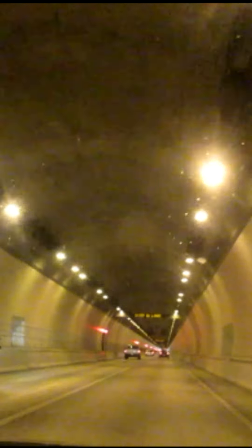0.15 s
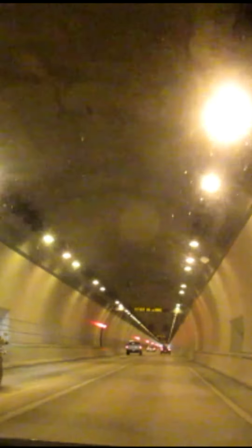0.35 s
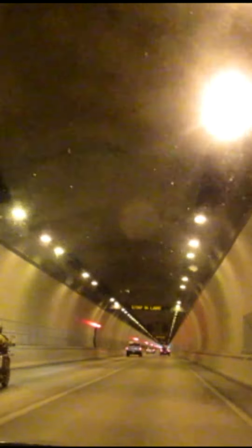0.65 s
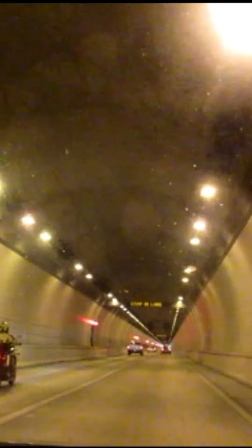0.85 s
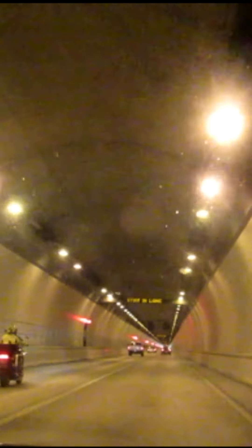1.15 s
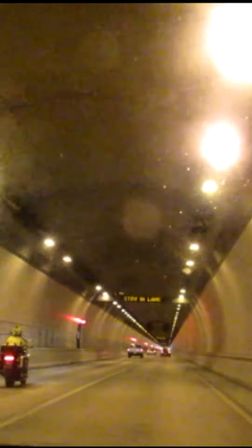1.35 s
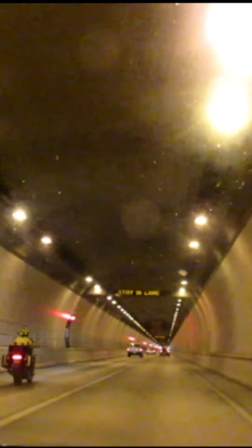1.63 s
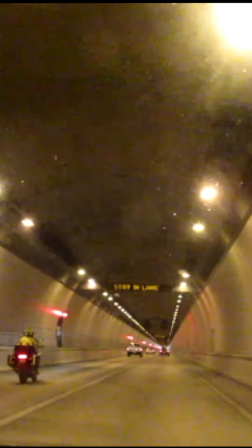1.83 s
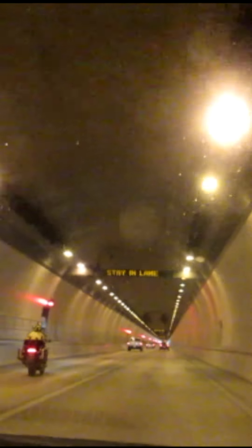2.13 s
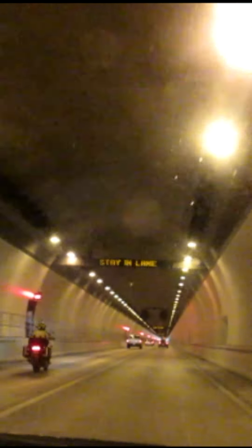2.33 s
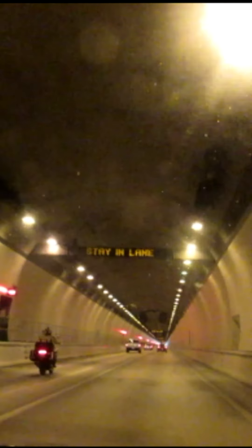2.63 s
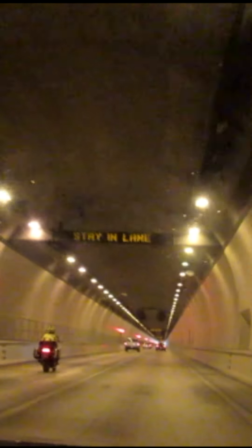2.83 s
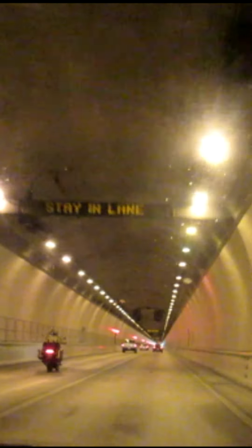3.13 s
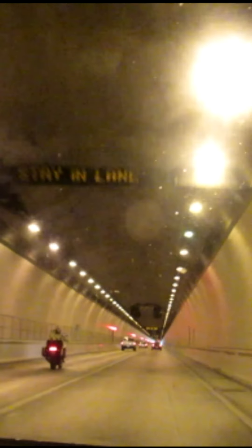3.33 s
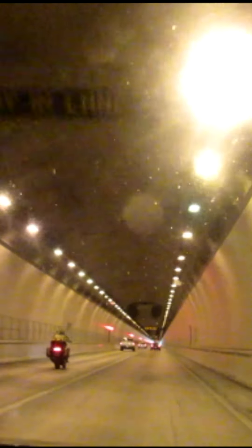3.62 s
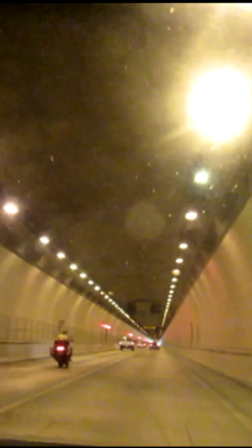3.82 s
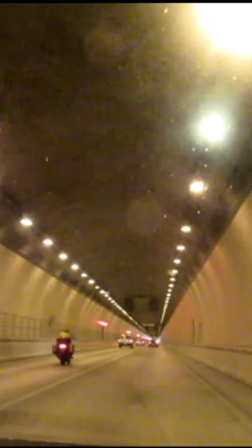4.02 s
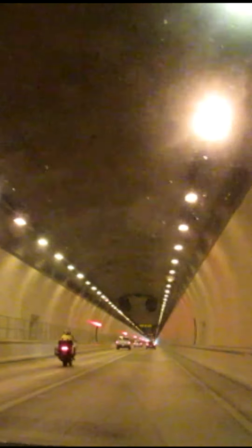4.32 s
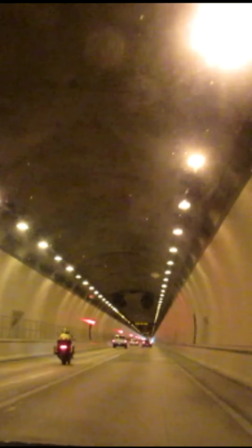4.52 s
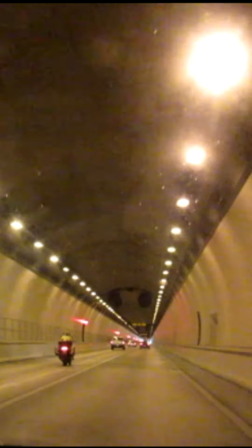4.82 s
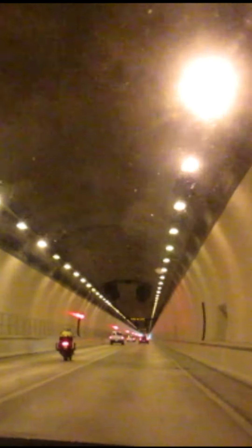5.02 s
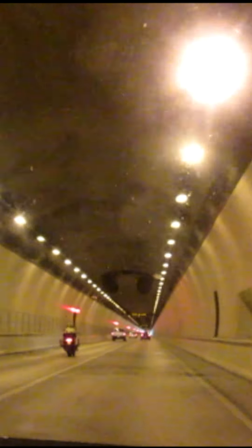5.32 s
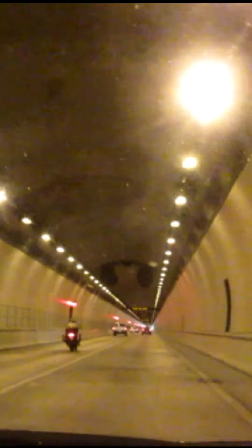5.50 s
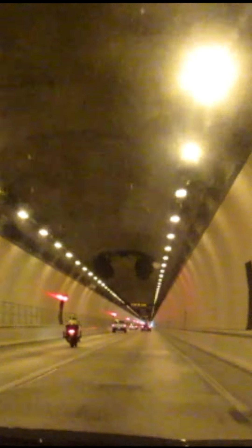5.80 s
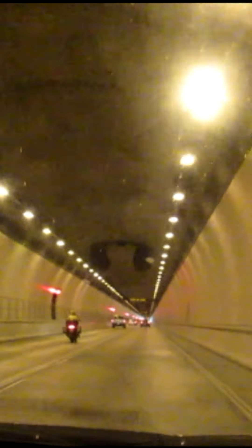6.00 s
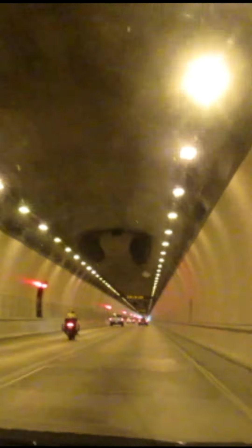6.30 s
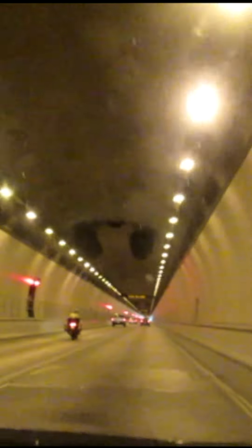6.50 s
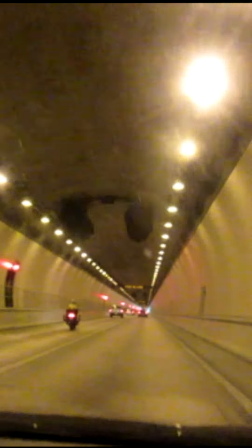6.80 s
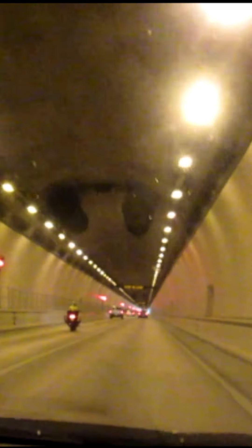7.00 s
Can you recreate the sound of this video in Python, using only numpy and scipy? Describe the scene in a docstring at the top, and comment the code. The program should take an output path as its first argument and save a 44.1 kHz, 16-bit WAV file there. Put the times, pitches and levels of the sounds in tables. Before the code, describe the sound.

From 0 to about 7 seconds, an unbroken wash of road noise fills a car cabin moving at steady speed through a concrete tunnel. Deep heave and rumble lie below a coarse midrange tyre roar, with a thin, slowly weakening wind hiss. A strong low hum wavers in pitch and swells in irregular short booms several times a second, cut by tiny dropouts; an especially strong boom comes near 5.6. Faint engine drone stays buried, slightly stronger around 2.6. A motorbike's low exhaust tone is faintly present at first, strongest near 1.8, and gone by 4. The roar dips slightly and recovers at about 1.2, 2.1, 3.3, 4.5, 5.9 and 6.5. A dull joint knock lands at 4.7, then a cluster at 6.4, one at 6.7 and one at 7.0. Loose lining rattles from 6.3 onward, with tiny bright ticks at 6.7 and 7.0. The sound stops while still driving.

```python
"""Road noise inside a car at steady speed in a concrete tunnel: coloured noise for heave, rumble, roar and hiss.
A wavering tone with a noisy skirt is the booming cabin hum; a narrow antiphase noise band is the tyre ring.
Faint engine and motorbike sine tones stand in the rumble; the bike draws ahead in the next lane and fades.
Joints knock as short damped modes, loose lining rattles as lumpy noise, the trim ticks as noise bursts."""
import sys
import numpy as np
from scipy import signal
from scipy.fft import rfft, irfft
from scipy.io import wavfile

SR = 44100
rng = np.random.default_rng(int(sys.argv[2]) if len(sys.argv) > 2 else 0)


def to_wav(sig):
    """Store sig (one row per channel, or 1-D mono) as 16-bit WAV at the path in sys.argv[1].

    Samples outside -1..1 are clipped; the rate is SR.
    """
    pcm = np.clip(np.atleast_2d(sig), -1, 1) * 32767
    pcm = np.round(pcm).astype(np.int16)
    wavfile.write(sys.argv[1], SR, pcm.T)  # frames by channels


N = 315315

# road roughness: time_s, roughness_db
ROUGHNESS = [(0, -3), (.25, -1), (.75, -0.5), (1.05, 0), (1.8, 0.5), (2.5, 0.), (3.0, 0.), (3.8, -0.5),
             (4.35, 1), (4.75, 0.5), (5.2, 1.16), (5.8, -1), (6.15, -0.5), (6.4, 1), (6.65, 0), (7.0, 1),
             (7.15, 0)]
# slow body heave: time_s, level_db
HEAVE = [(0, -27), (.55, -21), (.82, -26), (1.1, -18.5), (1.38, -26.5), (1.7, -21), (2.2, -27),
         (3.2, -25.5), (3.6, -23.5), (4.1, -23), (4.65, -22), (4.95, -24), (5.35, -18), (5.8, -23),
         (6.05, -28.5), (6.32, -18), (6.6, -22), (7.15, -16.5)]
# noise spectra, scaled later to unit rms: freq_hz, relative_density_db
HEAVE_COLOUR = [(7.1, -49), (12, -13), (70, -12), (97, -8), (110, -3.5), (140, -32), (240, -120)]
RUMBLE_COLOUR = [(62, -35), (105, -11), (130, -0.5), (155, -6.5), (227, -12), (260, -17.5), (311, -12),
                 (420, -19), (500, -20.5), (580, -25), (660, -27.5), (690, -39), (900, -80)]
ROAR_COLOUR = [(600, -43.5), (690, -16), (725, -10), (770, -5), (880, -2), (940, -1), (1010, 0.5),
               (1090, -2), (1140, -3), (1210, -7), (1320, -3.5), (1400, -5.5), (1490, -5), (1620, -9),
               (1720, -7), (1790, -10.5), (1870, -7), (2050, -10.5), (2160, -13.5), (2280, -12.5),
               (2600, -17), (3000, -21), (3210, -25), (3350, -24), (4170, -34), (7060, -120)]  # includes the cabin's ripples
HISS_COLOUR = [(2200, -25), (3200, -4.5), (4300, -1), (5000, -2), (6500, -4.5), (8000, -6), (10000, -9),
               (12500, -17), (13000, -21.5), (15000, -30)]
# heave and rumble thin around the cabin mode: center_hz, width_hz, share_removed
HUM_CLEARING = (131, 30, .6)
# edges of the roar bands that surge separately: edge_hz
ROAR_SPLITS_HZ = [850, 1200, 1650, 2150, 2800]
# gusts in the wind hiss: center_s, half_length_s, lift_db
GUSTS = [(1.12, .08, 0.5), (2.055, .082, 3), (3.219, .06, 0), (4.41, 0.062, 0.5)]
# drops of rumble, roar and hiss, each with a slow recovery: start_s, drop_db
STEPS = [(1.18, 1.5), (2.115, 2.5), (3.275, 1.5), (4.469, 2.5), (5.9, 1.5), (6.45, 2.5)]
RUMBLE_DB, ROAR_DB, HISS_DB = -20, -23.5, -45.5  # at zero roughness; hiss at time 0
RUMBLE_DB_PER_ROUGHNESS_DB, HISS_DB_PER_ROUGHNESS_DB = 1.4, 0.73
HISS_FADE_DB_PER_S = 0.26
FALL_S, RECOVERY_S = 0.017, 0.75  # linear fall; recovery to 1/e
SURGE_DB, SURGE_RATE_HZ = 0.6, 12

# hum between booms; pitch holds through booms too: time_s, pitch_hz, level_db (rms)
HUM_BED = [(0.0, 130.7, -24.5), (0.08, 125, -23), (0.38, 126.9, -20.5), (0.74, 125.1, -25),
           (1.19, 128.2, -25), (1.51, 127.8, -24), (1.65, 119, -22), (1.81, 120, -18.5), (1.91, 130, -26.5),
           (2.11, 133.1, -16), (2.35, 132.3, -21.5), (2.55, 139.3, -20), (2.73, 133.2, -23),
           (3.17, 136.5, -15.5), (3.44, 135.0, -17.5), (3.94, 135.3, -20.5), (4.04, 131.9, -23),
           (4.26, 135.8, -20.5), (4.38, 128.3, -24.5), (4.88, 135.8, -23.5), (4.96, 128.5, -29.5),
           (5.16, 127.2, -26), (5.26, 118.9, -28.5), (5.34, 127.2, -29), (5.63, 127.4, -23.5),
           (5.71, 133.5, -22), (5.83, 134.5, -15), (5.97, 126.6, -19), (7.09, 131.4, -20.5),
           (7.15, 130, -18)]
# hum swells added to the bed: center_s, peak_rms_db, length_s (at half height)
HUM_BOOMS = [(.091, -16.5, 0.03), (.267, -16, 0.032), (.34, -18, 0.056), (0.448, -15, .055),
             (0.551, -20, 0.097), (0.701, -13, 0.019), (.869, -13, 0.027), (1.04, -16.5, .06),
             (1.14, -14.5, 0.078), (1.275, -14, 0.032), (1.43, -28, 0.03), (1.73, -20, 0.023),
             (1.949, -19, 0.052), (2.111, -13, 0.037), (2.279, -15.5, 0.12), (2.514, -12.5, 0.017),
             (2.65, -25, 0.034), (2.916, -14, 0.026), (3.275, -17, 0.045), (3.4, -32, 0.14),
             (3.52, -20.5, 0.1), (3.764, -16, 0.05), (4.038, -23, 0.09), (4.281, -18.5, 0.082),
             (4.451, -13.5, 0.074), (4.6, -19.5, .05), (4.88, -20, 0.057), (5.03, -16, 0.026),
             (5.1, -22, 0.024), (5.176, -12.5, 0.042), (5.406, -17.5, 0.1), (5.53, -15, 0.034),
             (5.631, -10, 0.028), (5.741, -18, 0.078), (5.888, -15.5, 0.04), (6.1, -23, 0.033),
             (6.183, -14, 0.016), (6.279, -21, 0.067), (6.44, -19, 0.06), (6.544, -16.5, 0.043),
             (6.65, -26, 0.054), (6.83, -23, 0.08), (6.99, -22.5, 0.13), (7.122, -13.5, 0.025)]
# brief hum dropouts: center_s, depth_db
HUM_GAPS = [(.135, 10), (.62, 9), (1.62, 10), (2.41, 8), (2.55, 3), (2.68, 7), (3.08, 5.5), (4.35, 12),
            (4.7, 8), (5.27, 12), (5.57, 18), (5.66, 10), (5.84, 14), (5.97, 9), (6.14, 12), (6.23, 14),
            (6.39, 1), (7.07, 13)]
# noisy skirt of the cabin mode: center_hz, width_hz, level_db
HUM_SKIRT = (129, 14, -33)
HUM_WAVER_DB, HUM_WOBBLE_HZ = 0.7, 2.5  # spreads of bed level and pitch
HUM_GAP_HALF_S = 0.012

# air ring inside the tyres: center_hz, width_hz, level_db
TYRE_CAVITY = (241, 8, -41)

# engine, before TONE_TRIM_DB: time_s, firing_hz, level_db
ENGINE = [(0, 75.3, -33.5), (1.5, 76, -37.5), (2.3, 77.5, -33), (2.6, 77.54, -24), (3.4, 77.4, -29.5),
          (3.8, 77.94, -30), (4.4, 78.52, -33.5), (4.7, 78.8, -40), (5.5, 78.87, -33.5), (7.15, 77.6, -32)]
# engine orders: firing_multiple, relative_db
ENGINE_ORDERS = [(1, -9), (3, 0), (4, -7.5)]
# steady-pitch drone, before TONE_TRIM_DB: pitch_hz, level_db
DRONE = [(100, -40.5), (200, -34)]
# rough noise near the sixth order: center_hz, width_hz
GROAN_BAND = (462, 30)
# groan: time_s, level_db
GROAN_LEVEL = [(0, -37), (1, -39), (2, -46.5), (2.7, -38), (3.1, -33), (3.5, -41), (4.3, -36.5),
               (4.8, -38.5), (5.2, -30), (5.7, -34), (6.1, -35), (7.15, -37.5)]
# motorbike exhaust, before TONE_TRIM_DB: time_s, pitch_hz, level_db
BIKE = [(0, 157.3, -31), (1, 160.8, -27.5), (1.8, 164.5, -25), (2.5, 170.8, -36), (3.2, 170.1, -39),
        (4, 165.8, -57)]
TONE_TRIM_DB = 1

# road joints: start_s, peak_db
KNOCKS = [(4.666, -17), (6.364, -15), (6.372, -12), (6.426, -16), (6.743, -11.5), (7.036, -17)]
# body panel modes: freq_hz, relative_db
KNOCK_MODES = [(720, -6), (880, 0), (1040, -4), (1400, -12)]
KNOCK_SWELL_S = 0.0035  # time to envelope peak
# loose lining: time_s, level_db
RATTLE = [(0, -71.5), (6.25, -45.5), (6.34, -32), (6.4, -33), (6.46, -32), (6.8, -33), (7.15, -33.5)]
# rattle noise band: center_hz, width_hz
RATTLE_BAND = (860, 450)
# trim ticks: start_s, initial_rms_db
TICKS = [(6.738, -36), (7.038, -39)]
# tick spectrum, scaled later to unit rms: freq_hz, relative_density_db
TICK_COLOUR = [(1500, -10), (3500, -5), (4600, 4), (5800, -10), (7500, -12), (9000, -7), (11000, -12),
               (15000, -30)]
TICK_DECAY_S = 0.004  # to 1/e

# likeness of the two microphone ports: freq_hz, coherence
LIKENESS = [(20, .98), (70, .94), (130, .99), (350, .95), (550, .87), (750, .95), (950, .8), (2200, .94),
            (4000, .8), (6000, .58), (9000, .25), (15000, .15)]
# port level balance: freq_hz, left_minus_right_db
BALANCE_DB = [(16, -2), (40, 1), (130, 2.5), (330, 2), (500, 0), (1200, -1.5), (3000, -1), (8000, .6)]
# port phase: freq_hz, left_lead_rad
LEAD_RAD = [(16, 1.85), (30, 1.35), (60, .85), (130, .35), (230, .1), (500, -.4), (2000, -.12), (6000, -.4),
            (10000, -2)]
CUTOFF_HZ = 15050


def from_db(db):
    """Decibels to gain."""
    return 10 ** (np.asarray(db) / 20)


def rms_one(x):
    """Scale to unit rms."""
    return x / np.sqrt(np.mean(x ** 2) + 1e-20)


def in_time(rows):
    """Interpolate the columns of a time table to one value a sample."""
    time_s, *columns = np.transpose(rows)
    return [np.interp(np.arange(N) / SR, time_s, c) for c in columns]


def at_hz(points, size=N):
    """Interpolate a frequency table over log frequency onto the FFT grid."""
    hz, value = np.transpose(points)
    grid_hz = np.maximum(np.fft.rfftfreq(size, 1 / SR), 1)
    return np.interp(np.log(grid_hz), np.log(hz), value)


def drift(rate_hz):
    """Slow random wander of unit rms: two-pole low-passed noise made at SR / 40."""
    r = np.exp(-80 * np.pi * rate_hz / SR)
    white = rng.standard_normal(N // 40 + 2002)
    slow = signal.lfilter([1], [1, -2 * r, r * r], white)[2000:]  # skip the settling
    return np.interp(np.arange(N) / 40, np.arange(len(slow)), rms_one(slow))


def noise(gain, flicker_db=0., flicker_rate_hz=8.):
    """Coloured noise partly shared by the ports; shared part at unit rms before level flicker."""
    alike = np.clip(at_hz(LIKENESS), 0, 1)
    mid, side = rfft(rng.standard_normal((2, N))) * gain
    mid *= np.sqrt(1 + alike)
    side *= np.sqrt(1 - alike)
    pair = irfft(np.array([mid + side, mid - side]), N)
    return pair / pair.mean(axis=0).std() * from_db(flicker_db * drift(flicker_rate_hz))


def narrow(center_hz, width_hz):
    """Gain of a resonance passed twice; width at half gain."""
    offset_hz = np.fft.rfftfreq(N, 1 / SR) - center_hz
    return 1 / (1 + (2 * offset_hz / width_hz) ** 2)


def wavering(pitch_hz, level_db, waver_db):
    """A sine whose level and phase wander as the tunnel's echoes shift."""
    gain = from_db(level_db + TONE_TRIM_DB + waver_db * drift(0.98))
    phase_rad = 2 * np.pi * np.cumsum(pitch_hz) / SR + 0.52 * drift(2.8)
    return gain * np.sin(phase_rad)


def road():
    """The road shakes the body into heave and rumble; tyre roar and wind hiss come through the glass."""
    t = np.arange(N) / SR
    rough_db, = in_time(ROUGHNESS)
    center_hz, width_hz, share = HUM_CLEARING
    clearing = 1 - share * narrow(center_hz, width_hz)

    heave = from_db(in_time(HEAVE)[0]) * noise(from_db(at_hz(HEAVE_COLOUR)) * clearing)

    rumble_gain = from_db(RUMBLE_DB + RUMBLE_DB_PER_ROUGHNESS_DB * rough_db)
    rumble_colour = from_db(at_hz(RUMBLE_COLOUR)) * clearing
    rumble = rumble_gain * noise(rumble_colour, flicker_db=0.5, flicker_rate_hz=21.0)

    roar = from_db(ROAR_DB + rough_db) * surging_roar()

    gust_db = sum(db * np.exp(-.5 * ((t - s) / half_s) ** 2) for s, half_s, db in GUSTS)
    hiss_db = HISS_DB + HISS_DB_PER_ROUGHNESS_DB * rough_db - HISS_FADE_DB_PER_S * t + gust_db
    hiss = from_db(hiss_db) * noise(from_db(at_hz(HISS_COLOUR)), flicker_db=0.5, flicker_rate_hz=17.0)
    return heave + from_db(steps_db()) * (rumble + roar + hiss)


def surging_roar():
    """Tyre roar in neighbouring bands, each swelling and sinking by itself."""
    whole = rfft(noise(from_db(at_hz(ROAR_COLOUR)), flicker_db=0.09, flicker_rate_hz=22.0))
    band = np.searchsorted(ROAR_SPLITS_HZ, np.fft.rfftfreq(N, 1 / SR))
    return sum(from_db(SURGE_DB * drift(SURGE_RATE_HZ)) * irfft(whole * (band == k), N)
               for k in range(band.max() + 1))


def steps_db():
    """Level drops that fall quickly and recover exponentially."""
    t = np.arange(N) / SR
    total_db = np.zeros(N)
    for start_s, drop_db in STEPS:
        fall = np.clip((t - start_s) / FALL_S, 0, 1)
        total_db -= drop_db * fall * np.exp(-np.maximum(t - start_s, 0) / RECOVERY_S)
    return total_db


def hum():
    """The cabin mode: one wavering tone swelled by booms and cut by gaps, plus a noisy skirt."""
    t = np.arange(N) / SR
    pitch_hz, bed_db = in_time(HUM_BED)
    level = from_db(bed_db + HUM_WAVER_DB * drift(4.7))
    for center_s, peak_db, length_s in HUM_BOOMS:
        level += from_db(peak_db) * np.cos(np.pi / 2 * np.clip((t - center_s) / length_s, -1, 1)) ** 2
    gap_db = sum(db * np.exp(-.5 * ((t - s) / HUM_GAP_HALF_S) ** 2) for s, db in HUM_GAPS)
    level *= from_db(-gap_db)
    pitch_hz = pitch_hz + HUM_WOBBLE_HZ * drift(6)
    tone = np.sqrt(2) * level * np.sin(2 * np.pi * np.cumsum(pitch_hz) / SR)  # level is rms
    center_hz, width_hz, skirt_db = HUM_SKIRT
    return tone + from_db(skirt_db) * noise(narrow(center_hz, width_hz))


def tyre_ring():
    """Tyre air resonance: narrow noise in opposite phase left and right."""
    center_hz, width_hz, level_db = TYRE_CAVITY
    ring = irfft(rfft(rng.standard_normal(N)) * narrow(center_hz, width_hz), N)
    return from_db(level_db) * rms_one(ring) * [[1], [-1]]


def engine():
    """Orders of the firing rate, a steady-pitch drone and a rough noise band (groan)."""
    firing_hz, level_db = in_time(ENGINE)
    orders = sum(wavering(k * firing_hz, level_db + db, waver_db=0.5) for k, db in ENGINE_ORDERS)
    drone = sum(wavering(np.full(N, hz), db, waver_db=1.0) for hz, db in DRONE)
    groan = from_db(in_time(GROAN_LEVEL)[0]) * noise(narrow(*GROAN_BAND))
    return orders + drone + groan


def motorbike():
    """One exhaust tone, gliding in pitch and fading."""
    pitch_hz, level_db = in_time(BIKE)
    return wavering(pitch_hz, level_db, waver_db=2.5)


def knocks():
    """Tyres hit joints: panel modes swell and die, each with random strength and phase."""
    t = np.arange(SR // 20) / SR
    out = np.zeros(N + SR)
    swell = t / KNOCK_SWELL_S * np.exp(1 - t / KNOCK_SWELL_S)
    for start_s, peak_db in KNOCKS:
        ring = np.zeros(len(t))
        for hz, mode_db in KNOCK_MODES:
            strength, phase = rng.standard_normal(2)
            ring += from_db(mode_db + 1.5 * strength) * np.sin(2 * np.pi * hz * t + .6 * phase)
        knock = swell * ring
        out[round(start_s * SR):][:len(t)] += from_db(peak_db) * knock / np.abs(knock).max()
    return out[:N]


def rattle():
    """Loose cabin lining on rougher road: lumpy mid-band noise."""
    lumpy = noise(narrow(*RATTLE_BAND), flicker_db=3.0, flicker_rate_hz=25.0)
    return from_db(in_time(RATTLE)[0]) * lumpy


def ticks():
    """Trim ticks: bright noise bursts with exponential decay."""
    t = np.arange(N) / SR
    shape = np.zeros(N)
    for start_s, level_db in TICKS:
        decay = np.exp(-np.maximum(t - start_s, 0) / TICK_DECAY_S)
        shape += from_db(level_db) * (t >= start_s) * decay
    return shape * noise(from_db(at_hz(TICK_COLOUR)))


def scene():
    """Sum of all sources at the two ports."""
    return road() + hum() + tyre_ring() + engine() + motorbike() + knocks() + rattle() + ticks()


def record(dry):
    """Port level and phase differences by frequency, soft peak rounding, steep low-pass."""
    pad = SR // 4  # keeps the FFT ends out of the scene
    wide = np.pad(dry, ((0, 0), (pad, pad)), "reflect", reflect_type="odd")
    size = wide.shape[1]
    wide = wide * signal.windows.tukey(size, 2 * pad / size)
    # half of each difference goes to the left, its inverse to the right
    half = from_db(at_hz(BALANCE_DB, size) / 2) * np.exp(.5j * at_hz(LEAD_RAD, size))
    ports = irfft(rfft(wide) * np.array([half, 1 / half]), size)[:, pad:-pad]
    rounded = ports / (1 + (ports / .97) ** 6) ** (1 / 6)
    lowpass = signal.ellip(12, .5, 70, CUTOFF_HZ, fs=SR, output="sos")
    return signal.sosfilt(lowpass, rounded)


dry = scene()
out = record(dry)
to_wav(out)
```